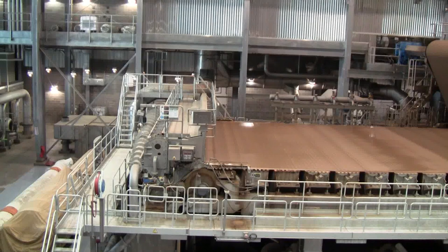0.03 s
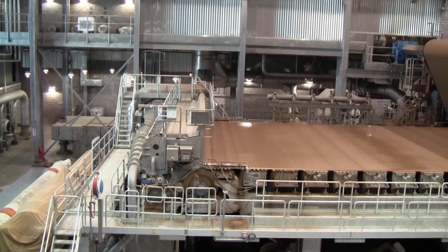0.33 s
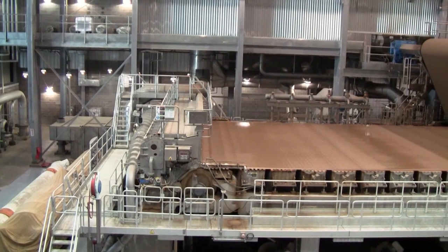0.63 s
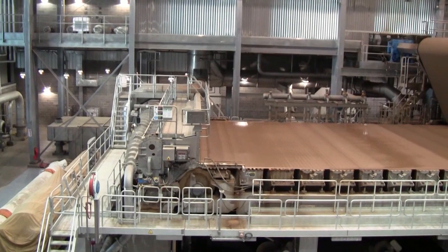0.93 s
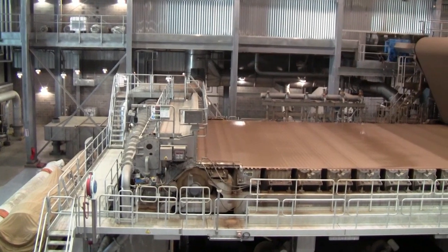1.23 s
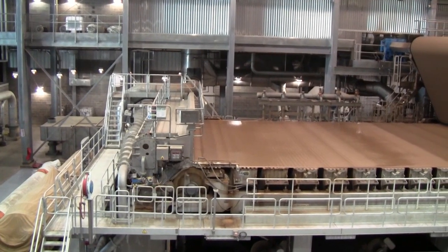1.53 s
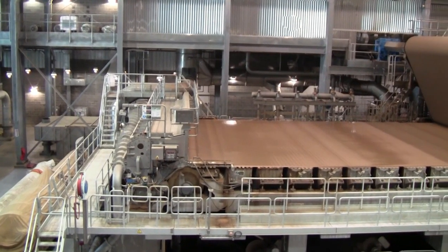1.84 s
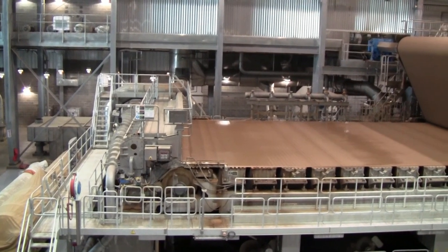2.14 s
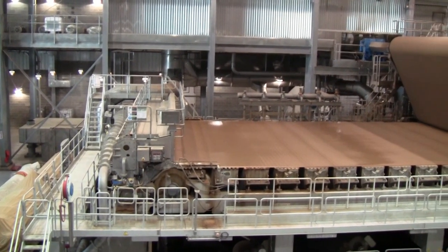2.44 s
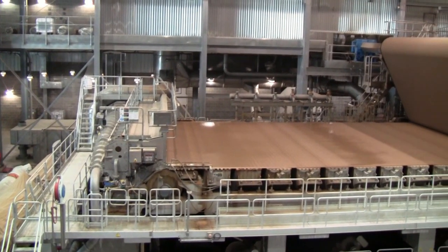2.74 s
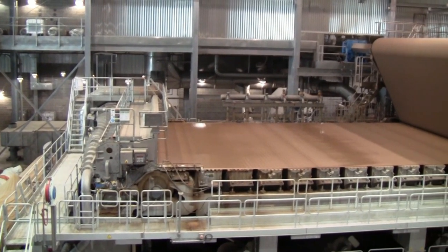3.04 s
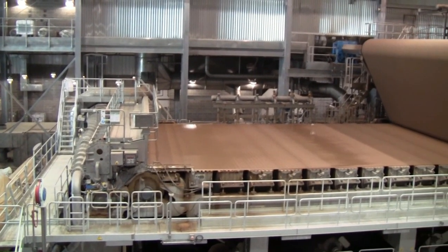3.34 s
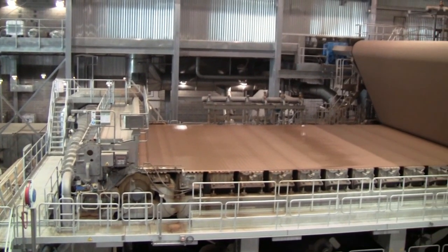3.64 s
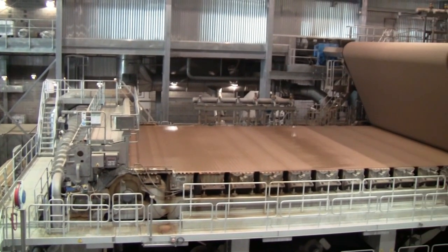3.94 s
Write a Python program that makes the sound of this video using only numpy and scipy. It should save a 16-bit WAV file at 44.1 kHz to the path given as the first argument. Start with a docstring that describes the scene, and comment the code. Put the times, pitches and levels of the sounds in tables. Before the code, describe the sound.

A large paper machine runs in a mill hall with a loud, steady roar of rolls and fans. Drives hum underneath, while light air hiss and two faint, wavering high motor whines sit on top throughout.

```python
"""Paper machine in a mill hall

Rolls and fans roar steadily, drives hum under them and air hisses off the moving web.
Motors whine on two tones nearly a semitone apart; their slightly different speeds make
each tone beat, and it wavers in the hall's echo."""
import sys
import numpy as np
from scipy import signal
from scipy.fft import rfft, irfft, next_fast_len
from scipy.io import wavfile
from scipy.ndimage import uniform_filter1d, minimum_filter1d, map_coordinates

SR = 44100
rng = np.random.default_rng(int(sys.argv[2]) if len(sys.argv) > 2 else 0)


def output_pcm(signal):
    """Save a mono or channel-first signal as 16-bit PCM at the path in sys.argv[1].

    Samples are clipped to [-1, 1] before scaling.
    """
    pcm = np.clip(np.atleast_2d(signal).T, -1, 1) * 32767
    wavfile.write(sys.argv[1], SR, np.round(pcm).astype(np.int16))


N = 176400

# stereo width of the hall: frequency_hz, side_over_mid_db
HALL_WIDTH = [(60, -33), (130, -25.5), (300, -17), (600, -14.5), (1200, -12), (2500, -7.5), (4500, -12.5),
              (8000, 0.5)]
# swells of roar and hiss, each taken about its mean: time_s, body_db, midrange_db, hiss_db
SWELLS = [(0.0, -21, -22.5, -39), (0.24, -17, -22, -38), (0.54, -18.5, -22.5, -38),
          (0.72, -17.5, -24, -39.5), (1.201, -18, -23.5, -38), (1.83, -18.5, -23.5, -38),
          (2.07, -16, -22.5, -38.5), (2.22, -16, -24, -36), (2.429, -18, -24, -39.5),
          (2.64, -17, -24.5, -35.5), (2.76, -18, -24, -38), (2.941, -17, -25, -36.5), (3.15, -17, -25, -37),
          (3.3, -18, -23.0, -37), (3.42, -15.5, -24, -35), (3.57, -16.5, -24.5, -36.5),
          (3.78, -16.5, -24.5, -37.5), (3.99, -17.5, -24.5, -37)]


def amp(db):
    """Decibels to gain."""
    return 10 ** (np.asarray(db) / 20)


def unit(x):
    """Scale to rms 1."""
    return x / np.sqrt(np.mean(np.abs(x) ** 2) + 1e-20)


def curve_at(points, hz):
    """Read a curve of (frequency_hz, value) points on a log frequency axis."""
    points_hz, values = np.transpose(points)
    return np.interp(np.log(hz + 1), np.log(points_hz + 1), values)


def wobble(knots_per_s):
    """A smooth random curve."""
    return map_coordinates(rng.standard_normal(1024), [np.arange(N) * knots_per_s / SR + 2], mode="wrap")


def filtered(x, response):
    """Filter x by a complex response, given as a function of Hz."""
    size = next_fast_len(N + SR // 2)
    return irfft(rfft(x, size) * response(np.fft.rfftfreq(size, 1 / SR)), size)[..., :N]


def stereo(mid, side):
    """Left and right from mid and side."""
    return np.array([mid + side, mid - side])


def swell_db(rows, column=1):
    """One level curve over time, in dB about its mean."""
    rows = np.array(rows)
    level = np.interp(np.arange(N) / SR, rows[:, 0], rows[:, column])
    return level - level.mean()


def rushing_noise(spectrum, side_db_at, patchy_db):
    """Shaped stereo noise of rms 1; patchy_db makes its level vary in patches of time and frequency."""
    bins = signal.stft(rng.standard_normal((2, N)), nperseg=512)[2]
    patches = uniform_filter1d(rng.standard_normal(bins.shape[1:]), size=12, axis=0)
    patches = uniform_filter1d(patches, size=20, axis=1)
    noise = signal.istft(bins * amp(patchy_db * unit(patches)))[1][:, :N]
    mid, side = filtered(noise, lambda hz: amp(curve_at(spectrum, hz)))
    side = filtered(side, lambda hz: amp(side_db_at(hz)))
    return unit(stereo(mid, side))


def echoing_tone(hz, width_hz, side_db, direct_over_echo, drift_hz=0):
    """A tone plus its echoes, whose strength and phase flutter differently in mid and side."""
    white = rng.standard_normal((2, N)) + 1j * rng.standard_normal((2, N))
    slow_band = np.exp(-.5 * (np.fft.fftfreq(N, 1 / SR) / width_hz) ** 2)
    mid_flutter, side_flutter = np.fft.ifft(np.fft.fft(white) * slow_band)
    carrier = np.exp(2j * np.pi * np.cumsum(np.full(N, hz) + drift_hz) / SR)
    mid = unit(((direct_over_echo + unit(mid_flutter)) * carrier).real)
    side = unit((side_flutter * carrier).real)
    return stereo(mid, amp(side_db) * side)


def web_hiss():
    """Air dragged along by the paper web, reaching the right channel first."""
    # tone colour of the air: frequency_hz, relative_density_db
    spectrum = [(800, -26.5), (2500, -3.5), (3600, -1), (5300, 0.5), (6100, -5.5), (7000, -8.5),
                (8000, -16.5), (8600, -32)]
    level_db, side_db, right_lead_s = -36.5, -8.5, 5.5e-5
    air = rushing_noise(spectrum, lambda hz: side_db, patchy_db=1.5)
    air = filtered(air, lambda hz: np.exp(1j * np.pi * right_lead_s * np.array([-hz, hz])))
    return amp(level_db + swell_db(SWELLS, column=3)) * air


def drive_hum():
    """Narrow hums of drives, gears and pumps, more hall echo than direct sound."""
    # one hum a row: pitch_hz, level_db, width_hz
    hums = [(70, -33.5, 5), (82.4, -29, 4), (144.5, -30.5, 5), (209, -34, 2), (253.4, -31.5, 2),
            (279.5, -31, 3.5), (328, -32, 5), (374.7, -36, 9.7), (418.6, -39.5, 1.5), (689, -37.5, 3),
            (726, -39.5, 3), (834, -39, 4), (1249, -38, 3), (1290, -46, 2), (3420, -57.5, 3.3)]
    return sum(amp(db) * echoing_tone(hz, width_hz, curve_at(HALL_WIDTH, hz), direct_over_echo=0.63)
               for hz, db, width_hz in hums)


def motor_whine():
    """Three motors at slightly different speeds beat on two whines and their octaves; one motor swells."""
    # lower and upper whine: level_db, octave_db
    whines = [(-43, -57), (-43, -58.5)]
    # swell of the lower whine, taken about its mean: time_s, level_db
    lower_swell = [(.04, -45.5), (.18, -43.5), (.45, -45.5), (.69, -48.5), (.85, -39), (.97, -48.5),
                   (1.07, -44.5), (1.24, -39.5), (1.33, -46.5), (1.6, -39.5), (1.69, -39), (1.78, -45.5),
                   (1.95, -44.5), (2.01, -44.5), (2.07, -42.5), (2.2, -39.5), (2.3, -47.5), (2.4, -38),
                   (2.55, -37), (2.63, -42), (2.69, -40), (2.78, -47), (3.0, -48.5), (3.16, -44),
                   (3.27, -46), (3.36, -34.5), (3.42, -45.5), (3.48, -42.5), (3.74, -40), (3.8, -47),
                   (3.99, -38.5)]
    # swell of the upper whine, likewise: time_s, level_db
    upper_swell = [(.04, -48.5), (.11, -40.5), (.19, -50.5), (.3, -43.5), (.43, -49.5), (.57, -37.5),
                   (.77, -52), (.85, -40.5), (.94, -38.5), (1.01, -36.5), (1.07, -46.5), (1.3, -46.5),
                   (1.42, -47.5), (1.5, -40), (1.6, -39.5), (1.68, -40.5), (1.87, -40.5), (2.0, -53),
                   (2.07, -37), (2.16, -44.5), (2.24, -42), (2.42, -44), (2.49, -34.5), (2.59, -49),
                   (2.8, -43), (2.93, -46), (3.12, -45), (3.2, -34.5), (3.26, -47.5), (3.33, -39.5),
                   (3.44, -44.5), (3.55, -43.5), (3.8, -45.5), (3.93, -37), (3.99, -43)]
    # balance of the motors, fastest first: trim_db, octave_trim_db, swell_share
    motors = [(0, 0, 1), (-7, -3, 0), (-4.5, -1, 0)]
    pitches_hz, speed_ratios = (3128, 3272.5), (1, .9982, .9962)
    wander_hz, width_hz = 2.5, 5
    out = np.zeros((2, N))
    for hz, (level_db, octave_db), swell in zip(pitches_hz, whines, (lower_swell, upper_swell)):
        for speed, (trim_db, octave_trim_db, swell_share) in zip(speed_ratios, motors):
            drift_hz = wander_hz * wobble(knots_per_s=12)
            tone = echoing_tone(speed * hz, width_hz, side_db=-8.5,
                                direct_over_echo=3.5, drift_hz=drift_hz)
            octave = echoing_tone(2 * speed * hz, 2 * width_hz, side_db=3.5,
                                  direct_over_echo=0.86, drift_hz=2 * drift_hz)
            out += amp(level_db + trim_db + swell_share * swell_db(swell)) * tone
            out += amp(octave_db + octave_trim_db) * octave
    return out


def roll_and_fan_roar():
    """Rolls and fans: a steady rumble under an upper bass, a body and a midrange that swell a little."""
    # tone colour of the roar: frequency_hz, relative_density_db
    spectrum = [(20, -24), (32, -15), (50, -10.5), (68, -1.5), (105, -2), (145, -0.5), (210, -0.5),
                (232, -3.5), (275, -2), (400, -4), (520, -6.5), (680, -7), (780, -9), (1000, -10),
                (1230, -13), (1500, -17), (2000, -22), (2800, -28), (4200, -34), (6000, -38.5), (8500, -66)]
    # swell of the upper bass, taken about its mean: time_s, level_db
    upper_bass_swell = [(.04, -26), (.45, -17.5), (.62, -21.5), (1.2, -20), (1.42, -21), (1.7, -18),
                        (1.88, -20), (2.08, -18.5), (2.35, -19), (3.99, -21)]
    level_db = -14
    noise = rushing_noise(spectrum, lambda hz: curve_at(HALL_WIDTH, hz), patchy_db=0)
    rumble = filtered(noise, lambda hz: 1 / (1 + (hz / 100) ** 8))
    bass = filtered(noise, lambda hz: 1 / (1 + (hz / 220) ** 8))
    midrange = filtered(noise, lambda hz: 1 - 1 / (1 + (hz / 900) ** 4))
    body = noise - bass - midrange
    return amp(level_db) * (rumble
                            + amp(swell_db(upper_bass_swell)) * (bass - rumble)
                            + amp(swell_db(SWELLS, column=1)) * body
                            + amp(swell_db(SWELLS, column=2)) * midrange)


def scene():
    """The whole machine, a touch to the right."""
    pan_db = 0.13
    machine = roll_and_fan_roar() + web_hiss() + drive_hum() + motor_whine()
    return amp([[-pan_db], [pan_db]]) * machine


def record(dry):
    """A fast fade-in and a cut of the top treble; only a rare, extreme peak is trimmed slightly."""
    threshold_db, trim_db_per_db, hold_s = -0.5, 0.54, 0.06
    start_s, fade_s, cutoff_hz = 0.038, 0.006, 8600
    peak_db = 20 * np.log10(np.abs(dry).max(0) + 1e-9)
    over_db = np.maximum(peak_db - threshold_db, 0)
    hold = int(hold_s * SR)
    trim_db = minimum_filter1d(-trim_db_per_db * over_db, hold, origin=(hold - 1) // 2)
    gain = amp(uniform_filter1d(trim_db, size=128))
    fade_in = np.clip((np.arange(N) / SR - start_s) / fade_s, 0, 1)
    return filtered(dry * gain * fade_in, lambda hz: hz < cutoff_hz)


dry = scene()
out = record(dry)
output_pcm(out)
```